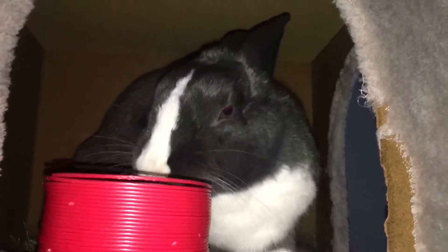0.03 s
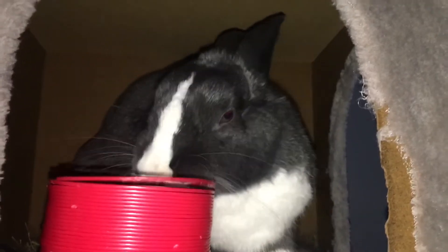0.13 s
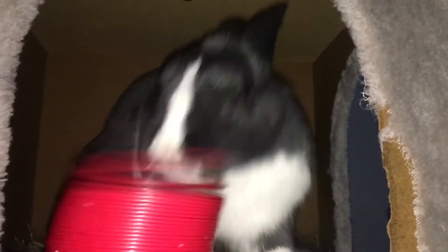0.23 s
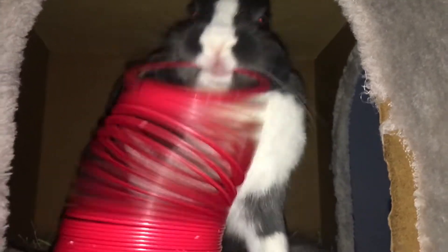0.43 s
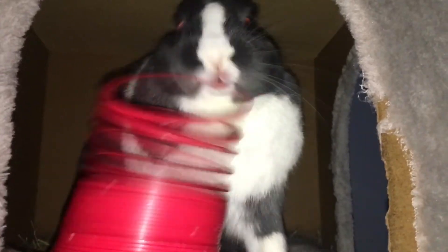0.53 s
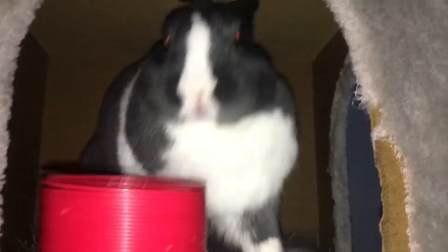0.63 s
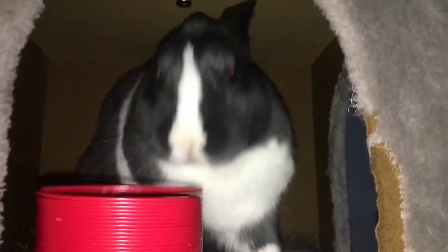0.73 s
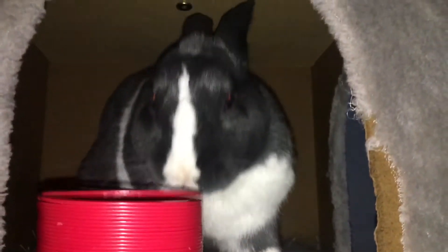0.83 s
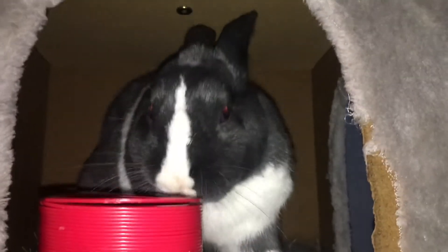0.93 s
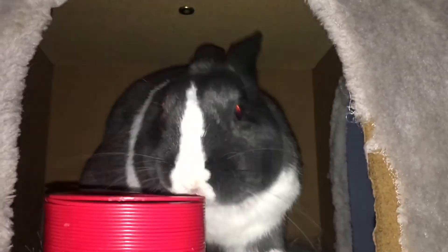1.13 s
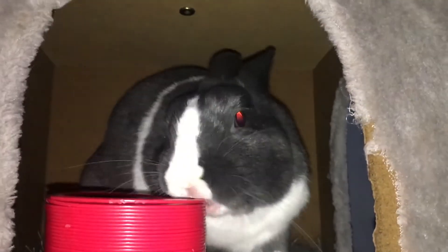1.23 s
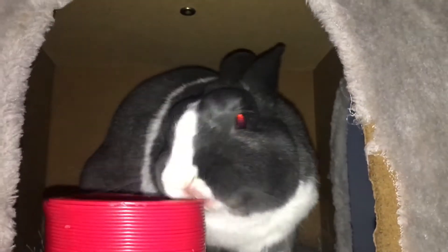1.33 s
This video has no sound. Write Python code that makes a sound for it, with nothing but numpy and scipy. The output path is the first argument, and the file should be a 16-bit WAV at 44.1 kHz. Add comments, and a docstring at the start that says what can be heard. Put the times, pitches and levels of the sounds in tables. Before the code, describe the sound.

A toy spring clatters briefly as its coils are lifted and dropped, then clicks faintly.

```python
"""A coiled toy spring clatters as a rabbit in a small den nudges it, lifts its top turns and lets them drop.
The coils tick as they peel apart, fall back onto the stack and settle; then the rabbit nibbles at the rim.
Each impact excites the modes of the wire and of the tube-like stack, and dispersion delays its low notes.
The stack bumps on the floor, the den adds a short reverberant tail, and the quiet room hums behind it."""
import sys
import numpy as np
from scipy import signal
from scipy.fft import rfft, irfft
from scipy.io import wavfile
from scipy.ndimage import uniform_filter1d

SR = 44100
rng = np.random.default_rng(int(sys.argv[2]) if len(sys.argv) > 2 else 0)


def dump(signal):
    """Clip the signal to [-1, 1] and save it as 16-bit WAV at the path in sys.argv[1]."""
    limited = np.clip(np.atleast_2d(signal).T, -1, 1)
    pcm = np.round(limited * 32767).astype(np.int16)
    wavfile.write(sys.argv[1], SR, pcm)


N = 61739


def amp(db):
    """Converts decibels to an amplitude ratio."""
    return 10 ** (np.asarray(db) / 20)


def unit_rms(x):
    """Normalises to rms 1."""
    return x / np.sqrt(np.mean(x ** 2) + 1e-20)


def unit_energy(x):
    """Normalises to energy 1."""
    return x / (np.linalg.norm(x) + 1e-20)


def curve_at(points, hz):
    """Interpolates a table on a logarithmic frequency axis."""
    point_hz, value = np.transpose(points)
    return np.interp(np.log(hz + 1), np.log(point_hz + 1), value)


def add(mix, start_s, sound):
    """Superposition: sums a sound into the mix from start_s on."""
    part = mix[max(round(start_s * SR), 0):][:len(sound)]
    part += sound[:len(part)]


def decay(t60_s, size=8192):
    """Exponential damping: the envelope falls 60 dB in t60_s."""
    return np.exp(-np.log(1000) * np.arange(size) / SR / t60_s)


def low_shelf(x, shelf_db, corner_hz=1910):
    """First-order shelving: raises or lowers the part of a sound below the treble."""
    lows = signal.sosfilt(signal.butter(1, corner_hz, fs=SR, output="sos"), x)
    return x + (amp(shelf_db) - 1) * lows


def room(noise_db=-57, waver_depth=0.22):
    """Ambient noise: a steady low rumble, and hum tones that waver by random amplitude modulation."""
    spectrum = [(20, -34), (30, -23), (42, 0), (60, 0.5), (88, -7), (170, -9), (270, -9.5), (400, -16),
                (700, -18.5), (1400, -28.5), (2800, -34), (5600, -37), (9500, -39.5), (15000, -50)]  # frequency_hz, relative_db
    hum_tones = [(59.2, -67), (119, -65), (450.5, -68.5)]  # pitch_hz, level_db
    hz, t = np.fft.rfftfreq(N, 1 / SR), np.arange(N) / SR
    rumble = irfft(rfft(rng.standard_normal(N)) * amp(curve_at(spectrum, hz)), N)
    out = amp(noise_db) * unit_rms(rumble)
    for pitch_hz, level_db in hum_tones:
        waver = unit_rms(irfft(rfft(rng.standard_normal(N)) * (hz < 10), N))
        tone = np.sin(2 * np.pi * (pitch_hz * t + rng.random()))
        out += amp(level_db) * unit_rms((1 + waver_depth * waver) * tone)
    return out


def den(source, tail_db=-12, size=16384):
    """Reverberation of a small enclosure: a short diffuse tail in which the treble dies first."""
    reverberation_times = [(150, .25), (600, 0.16), (1500, 0.19), (4000, 0.13), (8000, 0.0944),
                           (16000, 0.022)]  # frequency_hz, t60_s
    hz, t, noise = signal.stft(rng.standard_normal(size), SR, nperseg=256)
    damping = np.exp(-np.log(1000) * t / curve_at(reverberation_times, hz)[:, None])
    tail = signal.istft(noise * damping, SR, nperseg=256)[1]
    return amp(tail_db) * signal.fftconvolve(source, unit_energy(tail))[:N]


def thumps(attack_s=.006, size=16384):
    """Damped oscillation: the stack rocks on the floor when it is tugged and when the coils land."""
    floor_bumps = [(.212, 172, -47.5, 0.199), (0.517, 170.3, -50, .12)]  # start_s, pitch_hz, level_db, t60_s
    out, t = np.zeros(N), np.arange(size) / SR
    for start_s, pitch_hz, level_db, t60_s in floor_bumps:
        envelope = np.minimum(t / attack_s, 1) * decay(t60_s, size)
        add(out, start_s, amp(level_db) * envelope * np.sin(2 * np.pi * pitch_hz * t))
    return out


def contact(buzz_db=-1, rattle_db=-4, size=8192):
    """Impact of two coils: an impulse, a quick buzz and a fainter, longer rattle along the wire."""
    buzz, rattle = rng.standard_normal((2, size))
    sound = amp(buzz_db) * unit_energy(buzz * decay(t60_s=.009))
    sound += amp(rattle_db) * unit_energy(rattle * decay(t60_s=.038))
    sound[0] = 1  # the sharp tick
    return unit_energy(sound)


def chatter(contacts_per_s=2800, spread_db=4.8, places=8):
    """Shot noise: random impacts of uneven strength at several places, held at a steady mean level."""
    strength = amp(spread_db * np.clip(rng.standard_normal(N), -2, 2)) * rng.choice([-1, 1], N)
    impulses = strength * (rng.random(N) < contacts_per_s / SR)
    place = rng.integers(0, places, N)
    run = sum(signal.fftconvolve(impulses * (place == k), contact())[:N] for k in range(places))
    local_power = uniform_filter1d(run ** 2, size=400)
    return run / np.sqrt(local_power + 1e-9)


def clatter(scuff_edge_s=0.0011):
    """Amplitude envelopes shape the chatter into one long fall and several short scuffs."""
    # how hard the lifted coils clatter as they fall and stack up: time_s, level_db, shelf_db
    fall = [(.367, -53, 7.5), (.407, -43.5, 3), (.423, -31.5, -6.5), (.436, -34, 3.5), (.443, -23.5, -2),
            (.449, -45, 5), (.4635, -51.5, 10), (.466, -31, 6), (.476, -34, 2), (.491, -39.5, 7),
            (.498, -26, 0), (.516, -22.5, -2.5), (.527, -30.5, 4), (.531, -42.5, 13), (.556, -46.5, 4),
            (.590, -49, 9.5), (.603, -63, 8)]
    # scuffs of the coils under the rabbit's mouth: start_s, length_s, level_db, shelf_db
    scuffs = [(0.005, 0.021, -55, 7), (0.21, 0.013, -37, 1), (0.219, 0.016, -44, 9.5),
              (0.237, .03, -55.5, 7), (0.273, .028, -54.5, 6), (0.312, 0.0077, -43, -19),
              (.322, .034, -60.5, 8.5), (0.626, 0.016, -66.5, 13.5), (0.69, 0.015, -66, 12),
              (1.231, .011, -49.5, 7.5), (1.247, .015, -58.5, 12), (1.263, 0.0056, -51, 11.5),
              (1.307, 0.016, -54.5, 12)]
    t, run = np.arange(N) / SR, chatter()
    time_s, fall_db, fall_shelf_db = np.transpose(sorted(fall))
    envelope = amp(np.interp(t, time_s, fall_db, left=-140, right=-140))
    out = envelope * low_shelf(run, np.interp(t, time_s, fall_shelf_db))
    for start_s, length_s, level_db, shelf_db in scuffs:
        inside_s = np.minimum(t - start_s, start_s + length_s - t)
        gate = np.clip(inside_s / scuff_edge_s + .5, 0, 1)
        out += gate * amp(level_db) * low_shelf(run, shelf_db)
    return out


def knocks():
    """Impulsive excitation: single impacts of coil on coil that stand out."""
    impacts = [(.0104, -36, 10.5), (0.0147, -24.5, -19), (0.0272, -21, 3.5), (0.0397, -46, 16),
               (0.0613, -35, -8), (0.1898, -11.5, 9), (0.2037, -1, -9.5), (0.2054, -8.5, -34),
               (.2120, -6, -7), (.2360, -28.5, 13), (.2440, -28, -17), (0.249, -24.5, -21),
               (.2595, -38, -14), (0.278, -36.5, 13.5), (0.2919, -28.5, 4.5), (.3096, -23, -19),
               (.3121, -22.5, -19), (.3260, -30.5, -7), (0.3397, -28, 0), (.3567, -26, -4),
               (0.3634, -28.5, -6), (.3672, -28, -1.5), (0.3793, -21, -6.5), (.3830, -17, 2.5),
               (0.3884, -22, 0), (0.3941, -18.5, -3.5), (.3997, -22, -5), (0.4111, -21, -2),
               (0.422, -18, -7.5), (.4371, -7, -6.5), (.4425, -9.5, -1.5), (0.4444, -8, 2),
               (.4850, -16, -2), (.4923, -10.5, -1.5), (.4997, -1, -1), (0.4999, -8, -3.5), (0.5053, -5, 0),
               (0.5128, -9.5, -13), (0.5142, 3, -14.5), (.5186, -9, -3), (0.5522, -21.5, -3.5),
               (0.5641, -21.5, -7), (0.582, -39, 2), (.6360, -35, 4.5), (0.6657, -43.5, 10),
               (0.694, -38.5, 9.5), (.7748, -38.5, 0), (1.2260, -39, 17.5), (1.2590, -33.5, 14),
               (1.2668, -24, -23), (1.3105, -27.5, 6.5)]  # start_s, level_db, shelf_db
    out = np.zeros(N)
    for start_s, level_db, shelf_db in impacts:
        add(out, start_s, amp(level_db) * low_shelf(contact(), shelf_db))
    return out


def resonance(drive, modes, ring_db=-1.5, size=8192):
    """Modal response: the drive is convolved with a sum of damped sinusoids."""
    t = np.arange(size) / SR
    ring = sum(amp(relative_db) * unit_energy(decay(t60_s, size) * np.cos(2 * np.pi * pitch_hz * t))
               for pitch_hz, relative_db, t60_s in modes)
    return amp(ring_db) * signal.fftconvolve(drive, ring)[:N]


def bending_waves(x, delay_at_1khz_s=.0009, size=4096):
    """Dispersion: low notes travel more slowly along the wire; the contact spectrum colours them all."""
    contact_spectrum = [(60, -23), (200, -15), (450, -12), (650, -10.5), (900, -5), (1500, -4),
                        (2200, -5.5), (2800, -9), (4300, -3), (5100, -5.5), (6800, 3.5), (7700, -1),
                        (9000, 2.8), (10200, -2.5), (11700, -.5), (14000, -6.5), (15800, -7)]  # frequency_hz, relative_db
    hz = np.fft.rfftfreq(size, 1 / SR)
    log_gain = np.log(amp(curve_at(contact_spectrum, hz)))
    minimum_phase = -signal.hilbert(np.r_[log_gain, log_gain[-2:0:-1]]).imag[:len(hz)]
    phase_lag = 4 * np.pi * delay_at_1khz_s * np.sqrt(1000 * hz)
    response = irfft(np.exp(log_gain + 1j * (minimum_phase - phase_lag)))
    return signal.fftconvolve(x, unit_energy(response))[:N]


def spring(drive, lifted_s=0.31, landed_s=.6, open_stack_db=-15):
    """Resonance: impacts ring the wire and the tube-like stack, which rings less with its coils apart."""
    wire_modes = [(2294, -19, 0.063), (3340, -24, 0.032), (5490, -26, .07), (6640, -23.5, .045),
                  (7070, -31, 0.061), (8250, -35.5, .05), (8540, -30.5, .06), (9330, -22, 0.034),
                  (11550, -28, .06), (12420, -28.5, .06)]  # pitch_hz, relative_db, t60_s
    stack_modes = [(796, -13.5, 0.067), (1200, -26, .06), (4258, -15.5, .045), (4565, -20, .035),
                   (6600, -20.5, .045)]  # pitch_hz, relative_db, t60_s
    t = np.arange(N) / SR
    stack_coupling = np.where((t > lifted_s) & (t < landed_s), amp(open_stack_db), 1)
    wire = resonance(drive, wire_modes)
    stack = resonance(drive * stack_coupling, stack_modes)
    return bending_waves(drive + wire + stack)


def scene():
    """Superposition of the spring's direct sound, its reverberation in the den and the room noise."""
    toy = spring(clatter() + knocks()) + thumps()
    return (toy + den(toy) + room())[None]


def record(dry, cutoff_hz=15850):
    """Band limiting: a steep linear-phase low-pass removes the highest treble."""
    low_pass = signal.firwin(801, cutoff_hz, window=("kaiser", 9), fs=SR)
    return signal.oaconvolve(dry, low_pass[None], "same")


dry = scene()
out = record(dry)
dump(out)
```